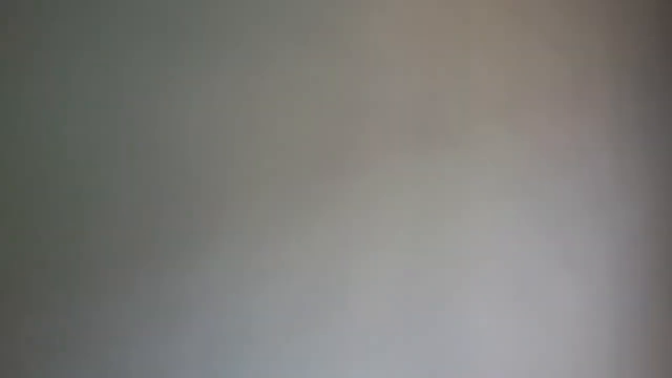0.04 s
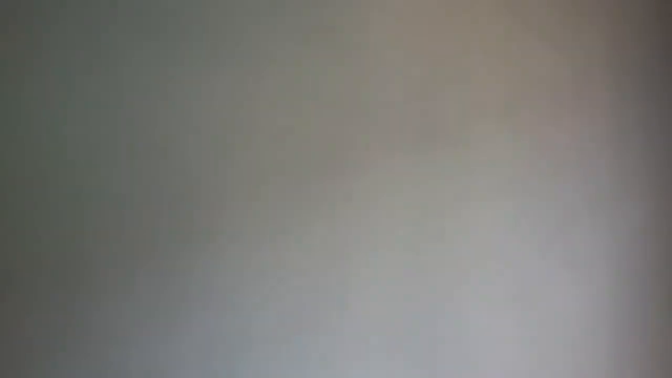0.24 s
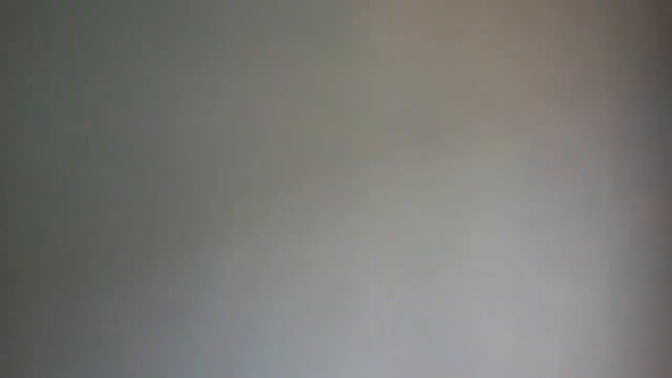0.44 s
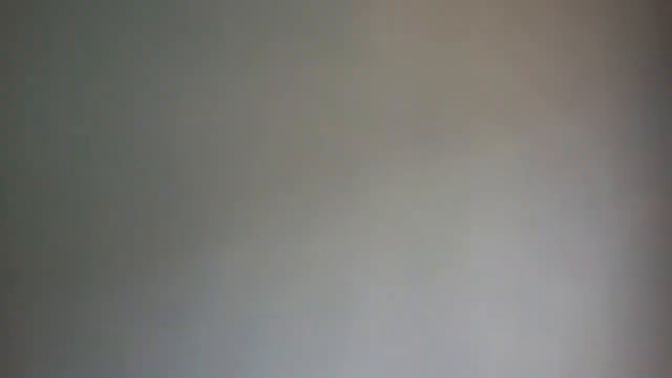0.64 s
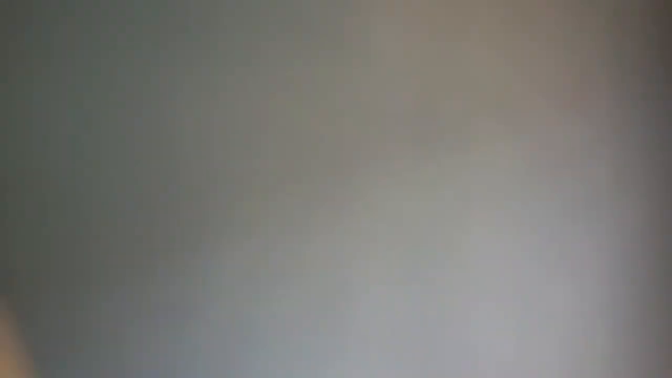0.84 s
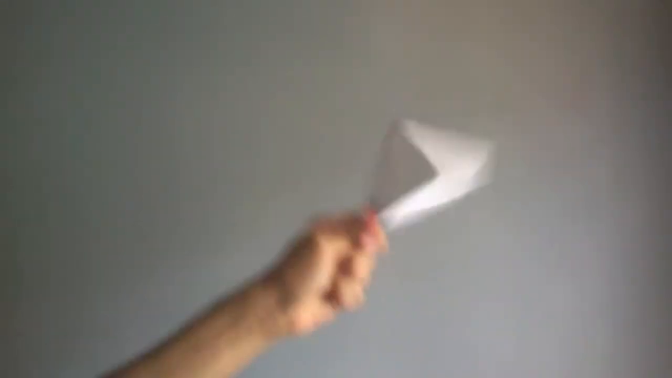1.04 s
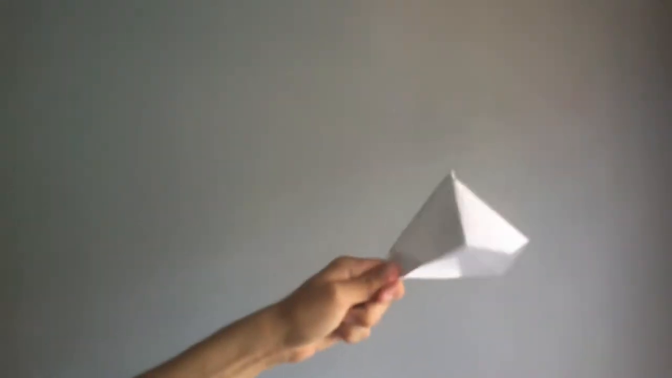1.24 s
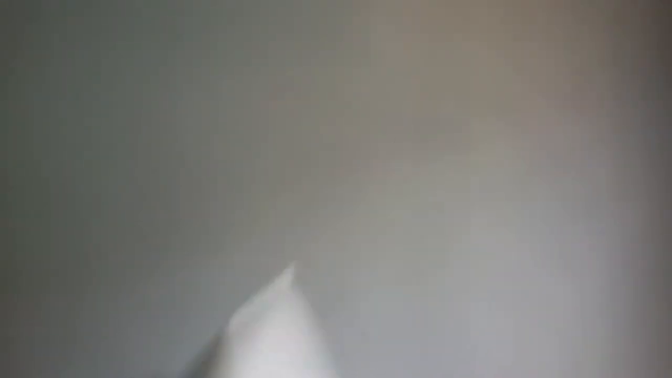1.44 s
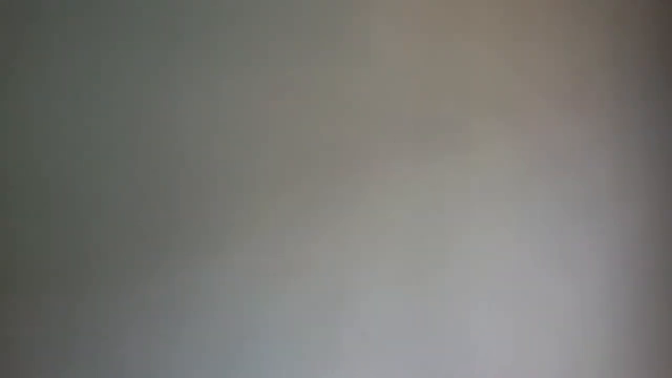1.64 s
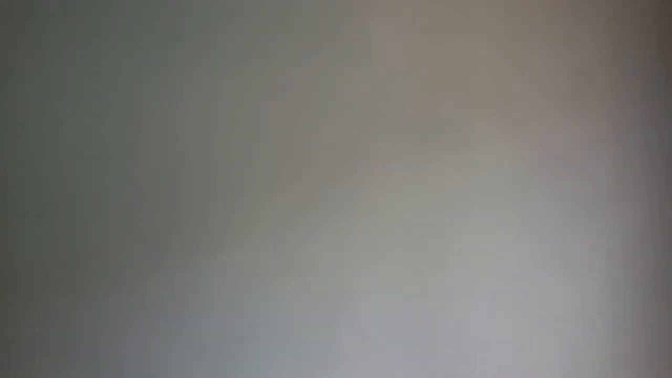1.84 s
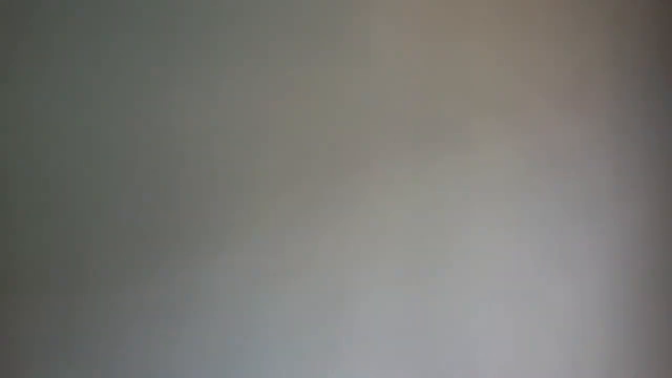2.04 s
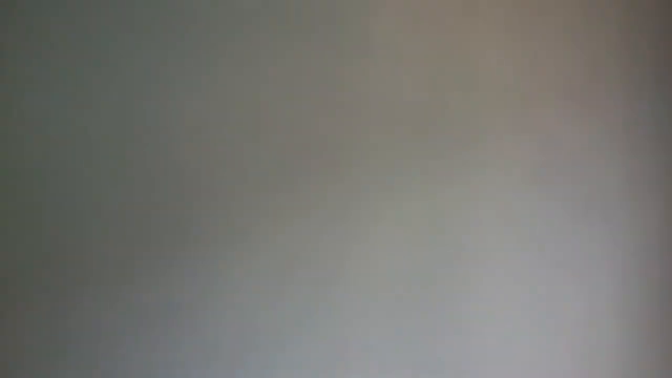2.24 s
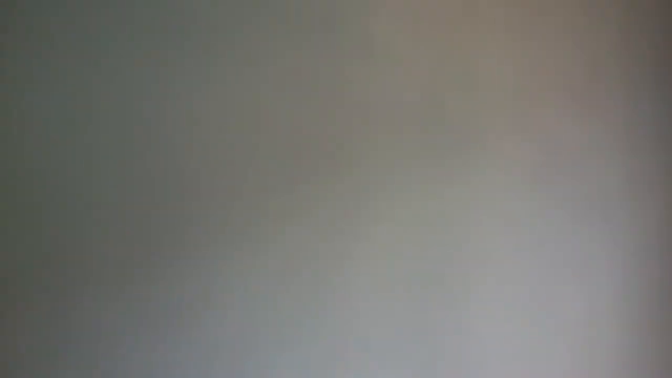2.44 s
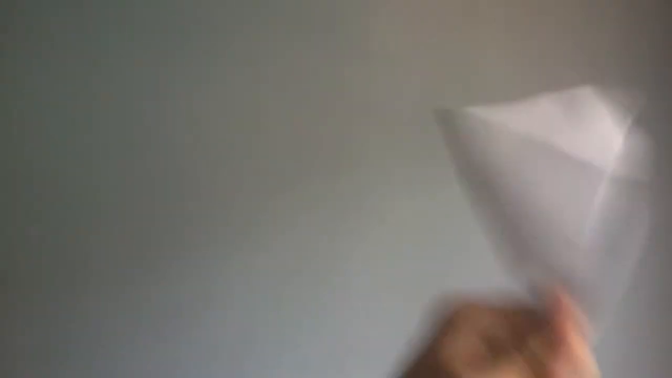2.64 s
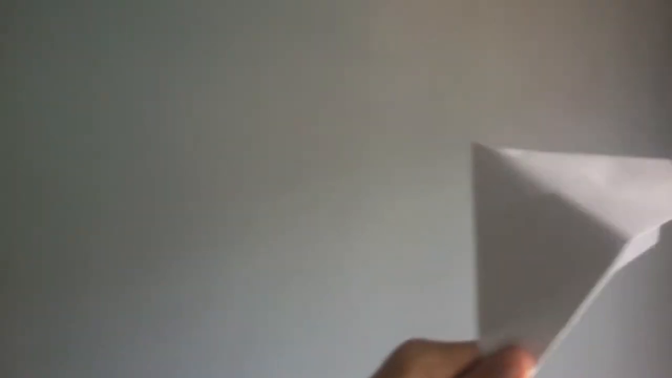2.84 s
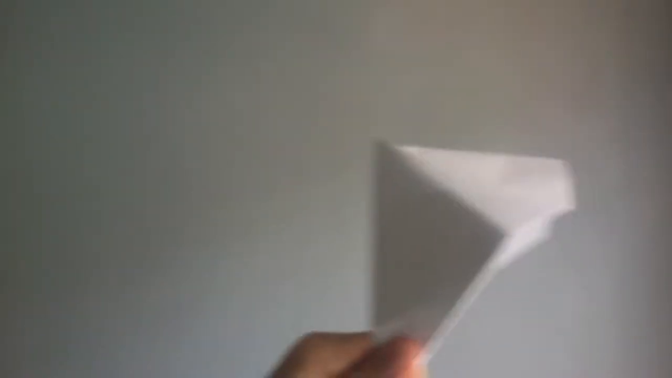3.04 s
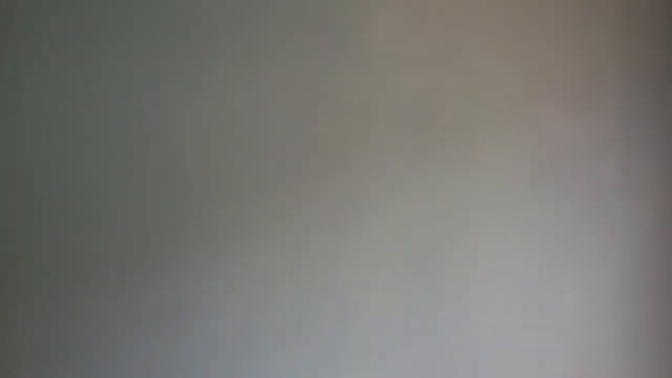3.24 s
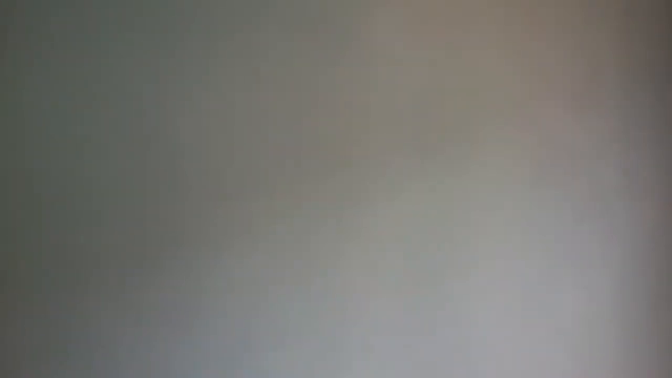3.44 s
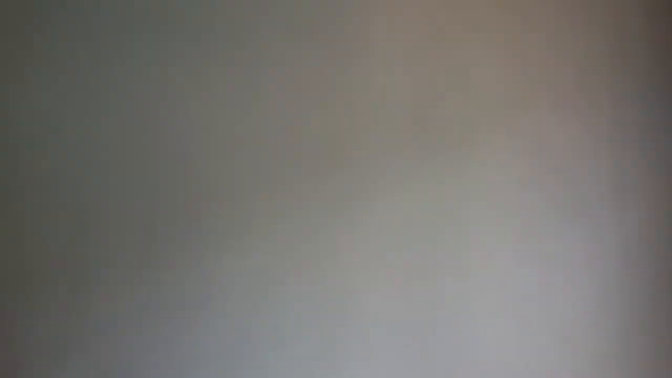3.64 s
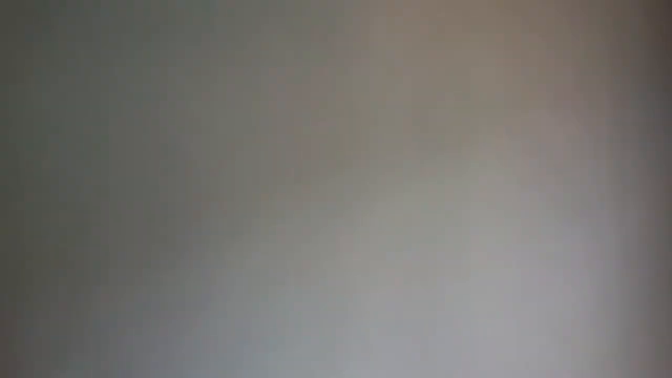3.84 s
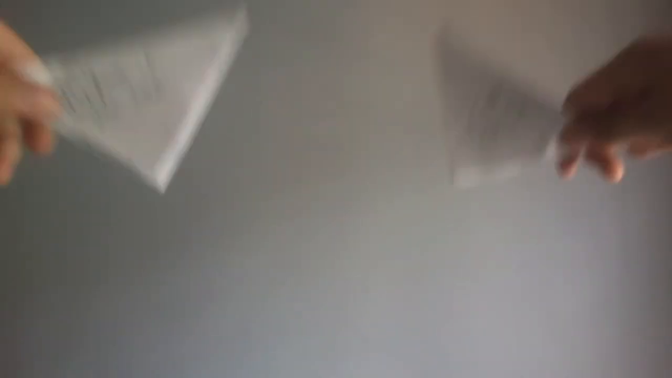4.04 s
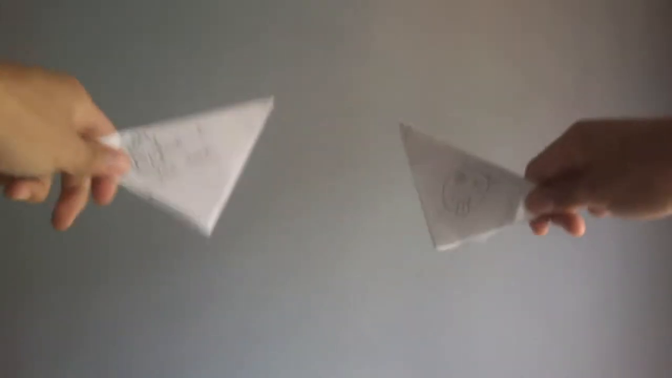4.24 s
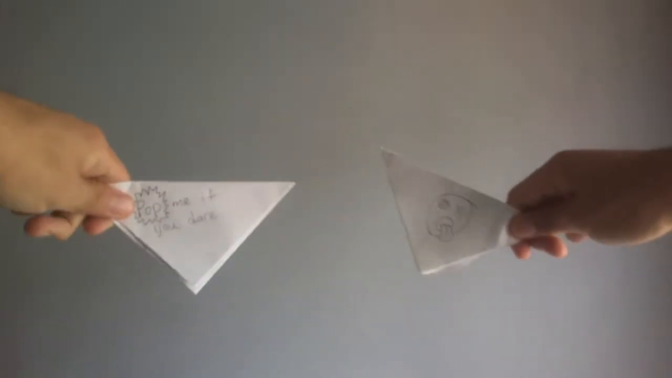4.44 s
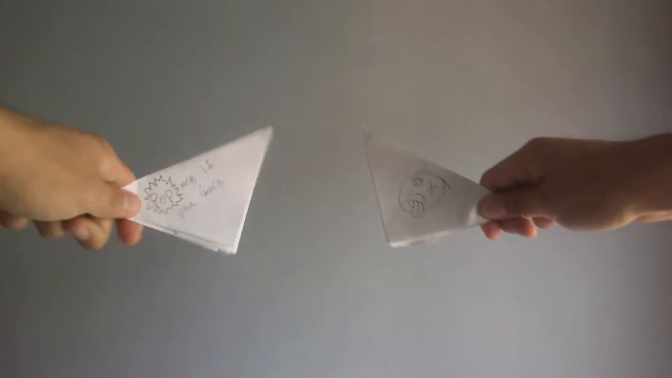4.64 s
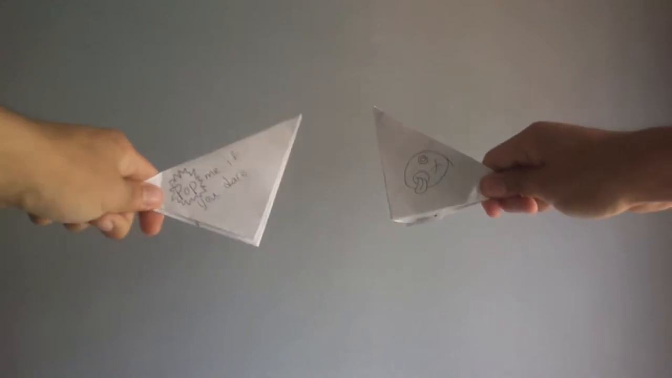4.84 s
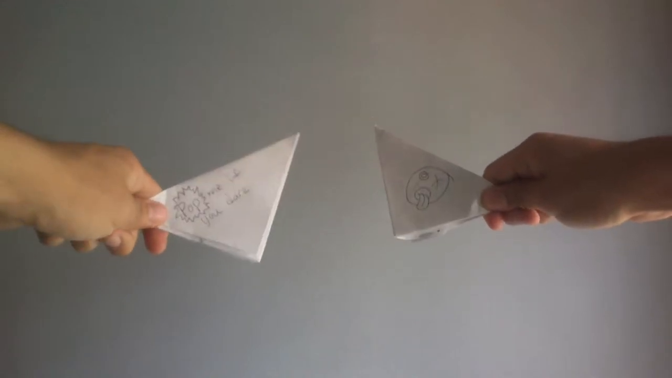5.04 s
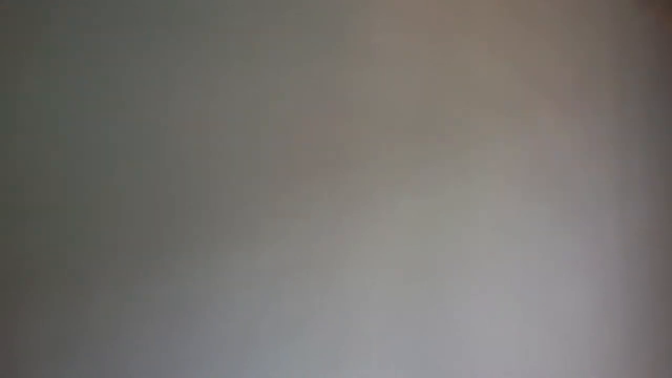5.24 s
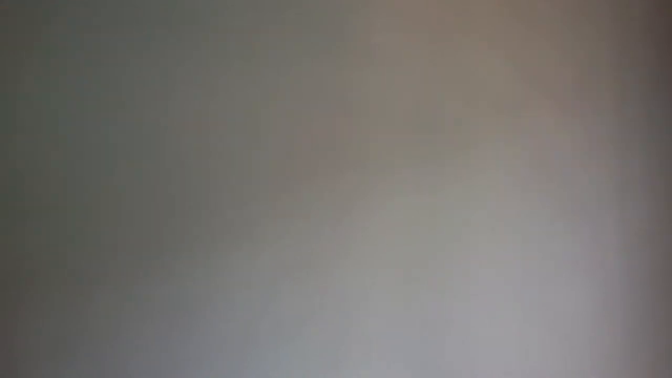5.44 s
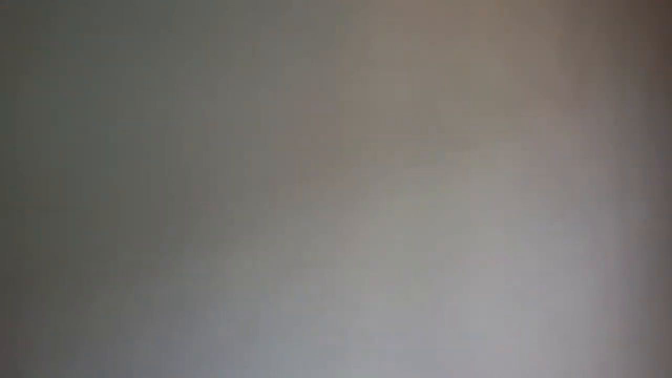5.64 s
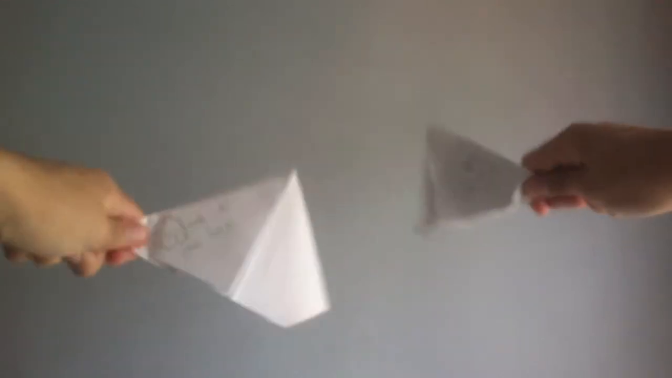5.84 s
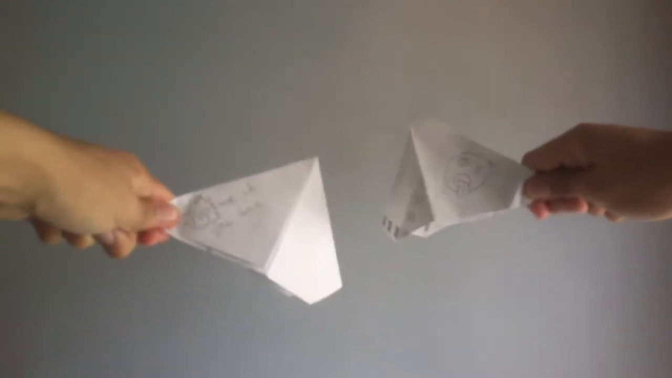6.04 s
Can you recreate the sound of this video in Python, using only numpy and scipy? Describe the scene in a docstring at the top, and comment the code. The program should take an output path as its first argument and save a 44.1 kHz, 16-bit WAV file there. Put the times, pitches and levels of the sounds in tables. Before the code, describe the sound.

Hand-swung paper poppers crack close to the microphone in a small, bare room. Two single snaps come about a second and a half apart, each dying away quickly in a short echo. After faint rustling of sleeves and fingers on paper, a near-simultaneous double snap ends the sequence, with a soft low puff of air on the microphone. The quiet background hiss briefly drops out three times.

```python
"""A small bare room. Folded paper poppers are swung down: two single snaps, then two almost together.
Each flap whips out with a pressure pulse and a burst of crackle; near walls repeat it, the room rings on.
Sleeves and paper rustle faintly between swings, over low rumble and hiss. The last swing's draught
reaches the microphone. The mono sound briefly fades out and in three times."""
import sys
import numpy as np
from scipy import signal
from scipy.fft import rfft, irfft, next_fast_len
from scipy.io import wavfile
from scipy.ndimage import map_coordinates

SR = 44100
rng = np.random.default_rng(int(sys.argv[2]) if len(sys.argv) > 2 else 0)


def wav_out(sig):
    """Save sig, one row per channel (or a flat mono array), as 16-bit PCM at SR to the path in sys.argv[1]."""
    wavfile.write(sys.argv[1], SR, np.round(np.clip(np.atleast_2d(sig).T, -1, 1) * 32767).astype(np.int16))


N = 269451

# Noise spectra. Each row: frequency in Hz, relative level in dB.
FLOOR_SPECTRUM = [(12, -27.5), (20, 1), (46, -2), (70, -15.5), (113, -14), (337, -26), (434, -29.5),
                  (485, -27), (642, -31.5), (1190, -36), (2320, -36), (3740, -38.5), (16000, -45.5)]  # rumble and microphone hiss
AIR_SPECTRUM = [(60, -5.5), (200, 0), (550, -1.5), (1150, -6.5), (2200, -17), (5000, -36)]  # room air, still or stirred
GRIP_SPECTRUM = [(700, -24), (1600, 10), (2400, 9), (3200, 3), (6000, -24), (14000, -25)]  # fingers on paper
RUSTLE_SPECTRUM = [(150, 2), (500, 4), (1200, 4.5), (2200, 2), (4000, 0), (7500, 1), (12000, -6.5),
                   (16000, -7.5)]  # sleeves and paper
SWISH_SPECTRUM = [(100, -8.5), (600, -0.5), (2000, -1.5), (6000, -8.5), (16000, -13)]  # the downswing
CRACKLE_SPECTRUM = [(300, -17.5), (1200, -1.5), (2100, 6), (2700, -5.5), (3200, -2), (5000, -0.5),
                    (7500, -2.5), (11500, -5), (16000, -11)]  # the sheet pulled taut
BOOM_SPECTRUM = [(40, -21), (70, -11.5), (136, -10.5), (240, -6.5), (350, -1), (600, -2), (1150, -2.5),
                 (1550, -3), (2200, -1.5), (2600, -14), (4000, -23), (9000, -46)]  # the pulse in the room
SIZZLE_SPECTRUM = [(150, -9), (800, -3.5), (2000, -5.5), (2650, -4), (3100, 2), (4000, -3), (5200, -0.5),
                   (7500, -3), (11500, -8.5), (16000, -14.5)]  # the crackle in the room
# Movements. Each row: end of rise in seconds, level in dB, then rise, hold and fall in seconds.
ARM_RUSHES = [(-0.005, -68, 0.0537, .22, 0.052), (2.032, -71, .15, 0.066, 0.046),
              (3.478, -73.5, 0.16, 0.0747, 0.25), (5.62, -67.5, 0.26, .25, 0.54)]
GRIP_SHIFTS = [(3.792, -81.5, 0.058, 0.16, 0.11), (4.454, -79.5, .12, .12, .15)]
SLEEVE_BRUSHES = [(.26, -72.5, 0.082, .01, 0.023), (1.869, -68.5, .035, .22, .06),
                  (2.484, -71, 0.12, 0.012, 0.028), (3.487, -60, 0.042, 0.026, 0.058),
                  (3.94, -73, .12, 0.054, 0.11095), (5.359, -78, 0.11, 0.041, 0.11),
                  (5.63, -70.5, .018, 0.015, .02)]
# Soft bumps and rubs. Each row: peak in seconds, level in dB, centre and width in Hz,
# half-length in seconds.
SOFT_BUMPS = [(1.846, -66.5, 984, 1193, 0.011), (1.987, -63, 1552, 2423, 0.022),
              (2.166, -68.5, 525, 89.2, 0.026), (2.29, -75.5, 1250, 170, 0.07),
              (2.31, -65.5, 150.8, 94.36, 0.13)]
# Draughts at the microphone. Each row: start in seconds, level in dB.
DRAUGHTS = [(5.708, -33)]
# Near surfaces. Each row: delay in seconds, gain.
WALL_ECHOES = [(.0052, 0.27), (.0085, 0.29), (0.0128, 0.11), (.0215, .12), (.029, 0.076)]
# Decay of the diffuse tail. Each row: frequency in Hz, T60 in seconds.
TAIL_T60 = [(100, 0.94), (260, 0.52), (700, 0.61), (1900, 0.42), (3000, 0.57), (5000, 0.55), (9000, 0.49),
            (15000, 0.51)]
# Colour of the slow late ring. Each row: frequency in Hz, relative level in dB.
LATE_RING_SPECTRUM = [(200, -3.5), (900, 0.5), (2200, -4), (3200, -4), (6000, -5.5), (12000, -21.5)]
# Room modes. Each row: frequency in Hz, relative level in dB, T60 in seconds.
STANDING_WAVES = [(165.7, -3, 0.61), (197.7, -0.5, 0.44), (248, -6, 1.3), (255.4, -4, 0.92),
                  (368.7, 1, .55), (422, -4, 0.48), (527.37, -12, 1.0), (558, -5.5, 0.46), (885, -7, 0.52),
                  (993, -4.5, 0.41), (1190, -10.5, 0.63), (1780, -14.5, .85), (1899, -13.5, .9),
                  (2200, -11.5, 0.38)]
# Flaps whipping out. Each row: time in seconds, pulse level in dB, pulse half-width in seconds,
# rebound share, crackle level in dB, sheet resonance in Hz, then levels in dB of room boom,
# room sizzle, standing waves, late ring (relative to the tail) and swish.
POPPER_SNAPS = [(0.9450, -9.5, 0.00016, 0.45, -15, 5000, -31, -34, -50, -15, -53.5),
                (2.5525, -0.5, 0.00014, 0.52, -10.5, 11940, -25.5, -32, -41, -14, -71),
                (5.6661, -3.5, 0.00014, 0.39, -12, 1470, -28, -33, -39.5, -15.5, -57.5),
                (5.696, -14.5, 0.00051, 0.12, -12, 9600, -37, -33.5, -40, -14, -66)]
# Dips to silence. Each entry: centre in seconds.
DIP_TIMES_S = [0.363, 2.226, 3.696]


def amp(db):
    """Decibels to gain."""
    return 10 ** (np.asarray(db) / 20)


def unit(x):
    """x at rms 1."""
    return x / np.sqrt(np.mean(x ** 2) + 1e-20)


def along(points, hz):
    """(Hz, value) points read on a log axis."""
    point_hz, values = np.transpose(points)
    return np.interp(np.log(hz + 1), np.log(point_hz + 1), values)


def noise(spectrum, size, ring_hz=5000, ring_db=0, ring_width=0.066):
    """Coloured noise of rms 1, with an optional broad resonance."""
    padded = next_fast_len(size)
    hz = np.fft.rfftfreq(padded, 1 / SR)
    db = along(spectrum, hz) + ring_db * np.exp(-((hz / ring_hz - 1) / ring_width) ** 2)
    return unit(irfft(rfft(rng.standard_normal(padded)) * amp(db), padded)[:size])


def wobble(rate_hz, size=N):
    """Smooth random curve, rate_hz knots a second."""
    knots = rng.standard_normal(int(size * rate_hz / SR) + 4)
    return map_coordinates(knots, [np.arange(size) * rate_hz / SR])


def add(track, start_s, x):
    """Mix x into the track from start_s on."""
    start = round(start_s * SR)
    track[start:start + len(x)] += x[:N - start]


def swell(peak_s, db, rise_s, hold_s, fall_s):
    """Gain of one movement: grows until peak_s, holds, dies away."""
    t = np.arange(N) / SR - peak_s
    return amp(db) * np.exp(np.minimum(t, 0) / rise_s - np.maximum(t - hold_s, 0) / fall_s)


def background(floor_db=-63.0, air_db=-77.5, waver_db=1, waver_hz=4.6, flurry_db=2, flurry_hz=18):
    """Steady rumble, hiss and murmuring air; moving arms stir the air into a dull, uneven rush."""
    still = amp(air_db + waver_db * wobble(waver_hz))
    stirred = sum(swell(*rush) for rush in ARM_RUSHES) * amp(flurry_db * wobble(flurry_hz))
    floor = amp(floor_db) * noise(FLOOR_SPECTRUM, N)
    return floor + np.hypot(still, stirred) * noise(AIR_SPECTRUM, N)


def bumps():
    """Faint bumps and rubs: short swells of narrow-band noise."""
    t = np.arange(N) / SR
    out = np.zeros(N)
    for peak_s, db, centre_hz, width_hz, half_length_s in SOFT_BUMPS:
        baseband = wobble(width_hz) + 1j * wobble(width_hz)
        band = np.real(baseband * np.exp(2j * np.pi * centre_hz * t))
        out += amp(db) * np.exp(-((t - peak_s) / half_length_s) ** 2) * unit(band)
    return out


def fingers(grain_db=2, grain_hz=51):
    """The grip slides softly on the two raised poppers."""
    level = sum(swell(*shift) for shift in GRIP_SHIFTS)
    return level * amp(grain_db * wobble(grain_hz)) * noise(GRIP_SPECTRUM, N)


def sleeves(grain_db=1.0, grain_hz=400):
    """Sleeves and paper slide as the arms move: a fine-grained rustle."""
    level = sum(swell(*brush) for brush in SLEEVE_BRUSHES)
    return level * unit(noise(RUSTLE_SPECTRUM, N) * amp(grain_db * wobble(grain_hz)))


def draught(sway_hz=15, decay_s=0.036, eddy_depth=0.3, eddy_hz=70):
    """A draught pushes on the microphone and swings back, ruffled by eddies."""
    t = np.arange(SR // 2) / SR
    out = np.zeros(N)
    for start_s, db in DRAUGHTS:
        add(out, start_s, amp(db) * np.exp(-t / decay_s) * np.sin(2 * np.pi * sway_hz * t))
    return out * (1 + eddy_depth * wobble(eddy_hz))


def resonance_clusters(x, ripple_db=2, spacing_hz=14):
    """Clusters of room resonances lift and sink narrow bands of x at random."""
    positions = np.fft.rfftfreq(len(x), 1 / SR) / spacing_hz
    ripple = map_coordinates(rng.standard_normal(len(positions)), [positions])
    return irfft(rfft(x) * unit(amp(ripple_db * ripple)), len(x))


def room(sheet_hz, boom_db, sizzle_db, standing_db, late_db, late_t60_s=1.447,
         early_db=2, early_decay_s=0.012, build_s=0.00049, drift_rad=0.45, drift_hz=25):
    """Scattered sound returns as a diffuse tail, with standing waves and a faint, darker late ring."""
    t = np.arange(SR + SR // 2) / SR
    boom = amp(boom_db) * noise(BOOM_SPECTRUM, len(t), sheet_hz, ring_db=0.5, ring_width=0.2)
    sizzle = amp(sizzle_db) * noise(SIZZLE_SPECTRUM, len(t), sheet_hz, ring_db=2.0)
    hz, frame_s, bands = signal.stft(resonance_clusters(boom + sizzle), SR, nperseg=256)
    decay = amp(-60 * frame_s / along(TAIL_T60, hz)[:, None])
    late_ring = amp(late_db + along(LATE_RING_SPECTRUM, hz)[:, None] - 60 * frame_s / late_t60_s)
    tail = signal.istft(bands * np.hypot(decay, late_ring), SR, nperseg=256)[1][:len(t)]
    tail *= amp(early_db * np.exp(-t / early_decay_s))
    wander_rad = drift_rad * wobble(drift_hz, len(t))
    for mode_hz, db, t60_s in STANDING_WAVES:
        phase_rad = 2 * np.pi * (mode_hz * t + rng.random()) + wander_rad
        tail += amp(standing_db + db - 60 * t / t60_s) * np.sin(phase_rad)
    return tail * (1 - np.exp(-t / build_s))


def flap(t, pulse_db, half_width_s, rebound, crackle_db, sheet_hz,
         rebound_lag_s=0.00053, rebound_half_width_s=0.00014, taut_lag_s=0.00072,
         crackle_decay_s=0.0011, flutter_db=-19, flutter_decay_s=0.017):
    """The pocket sucks air as it opens, then rebounds; the sheet crackles as it is pulled taut."""
    suck = -np.exp(-(t / half_width_s) ** 2)
    push = rebound * np.exp(-((t - rebound_lag_s) / rebound_half_width_s) ** 2)
    taut_s = np.maximum(t - taut_lag_s, 0)
    rise = np.clip(t / taut_lag_s, 0, 1) ** 2
    burst = np.exp(-taut_s / crackle_decay_s)
    flutter = amp(flutter_db) * np.exp(-taut_s / flutter_decay_s)
    crackle = rise * (burst + flutter) * noise(CRACKLE_SPECTRUM, len(t), sheet_hz, ring_db=7.0)
    return amp(pulse_db) * (suck + push) + amp(crackle_db) * crackle


def poppers(lead_s=0.1, swish_rise_s=0.025, direct_delay_s=0.0014, direct_gain=0.83):
    """Each swing swishes up to its snap; near walls repeat the snap and the room rings."""
    t = np.arange(SR // 5) / SR - lead_s
    swing = np.exp(-abs(t) / swish_rise_s) * (t < 0)
    out = np.zeros(N)
    for snap in POPPER_SNAPS:
        snap_s, pulse_db, half_width_s, rebound, crackle_db, sheet_hz, *room_levels_db, swish_db = snap
        add(out, snap_s - lead_s, amp(swish_db) * swing * noise(SWISH_SPECTRUM, len(t)))
        for delay_s, gain in [(direct_delay_s, direct_gain), *WALL_ECHOES]:
            # Fresh crackle per path: each wall sees another side of the sheet.
            arrival = flap(t, pulse_db, half_width_s, rebound, crackle_db, sheet_hz)
            add(out, snap_s - lead_s + delay_s, gain * arrival)
        add(out, snap_s, room(sheet_hz, *room_levels_db))
    return out


def scene():
    """One microphone feeds both channels."""
    mono = poppers() + draught() + sleeves() + fingers() + bumps() + background()
    return np.array([mono, mono])


def record(dry, fade_s=0.09, fade_power=0.9, cutoff_hz=15900):
    """The level dips briefly to silence three times; a steep low-pass trims the top."""
    to_dip_s = np.min(abs(np.arange(N) / SR - np.array(DIP_TIMES_S)[:, None]), axis=0)
    faded = dry * np.clip(to_dip_s / fade_s, 0, 1) ** fade_power
    lowpass = signal.ellip(10, 0.1, 80, cutoff_hz, fs=SR, output="sos")
    return signal.sosfilt(lowpass, faded)


dry = scene()
out = record(dry)
wav_out(out)
```